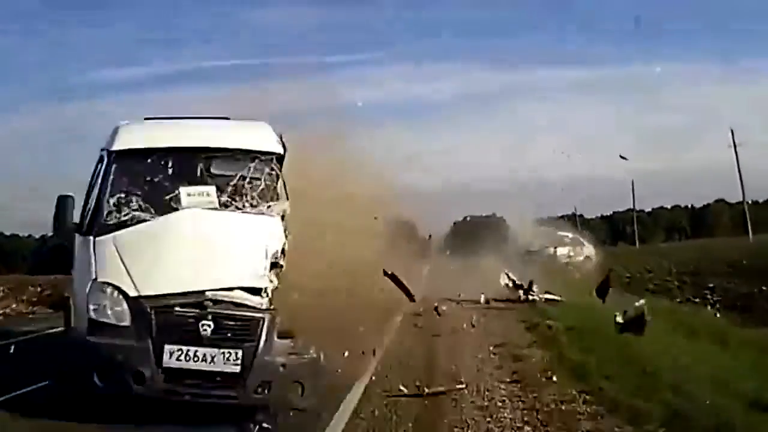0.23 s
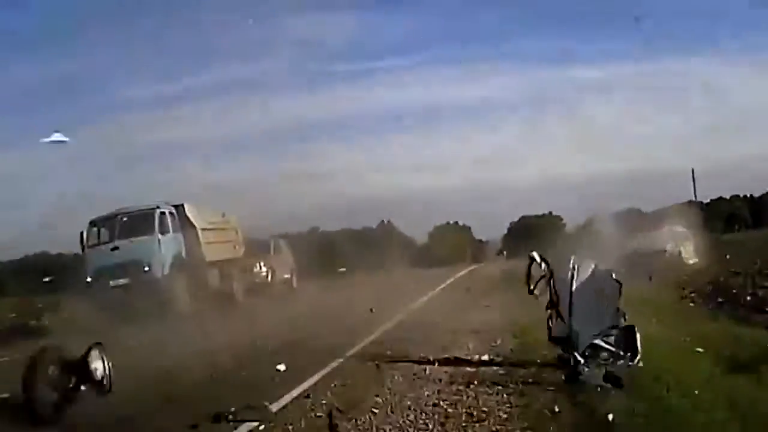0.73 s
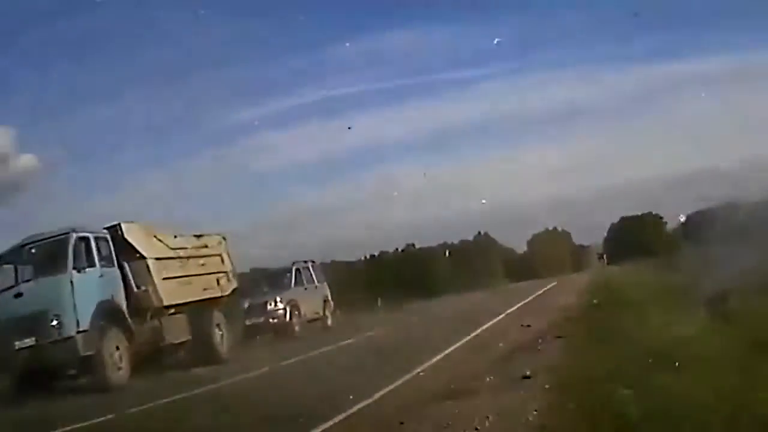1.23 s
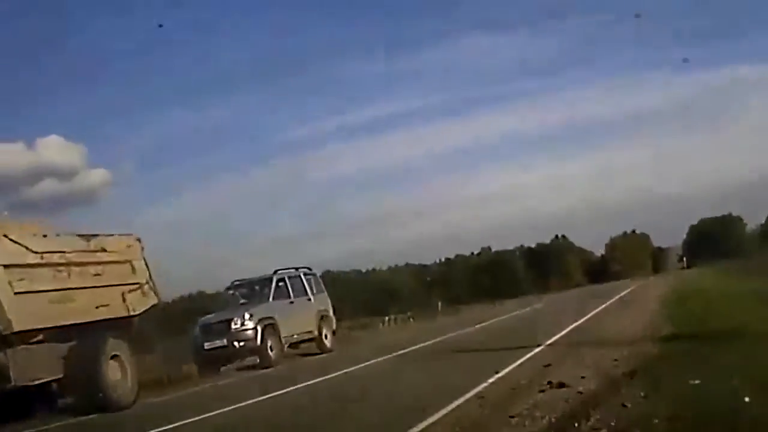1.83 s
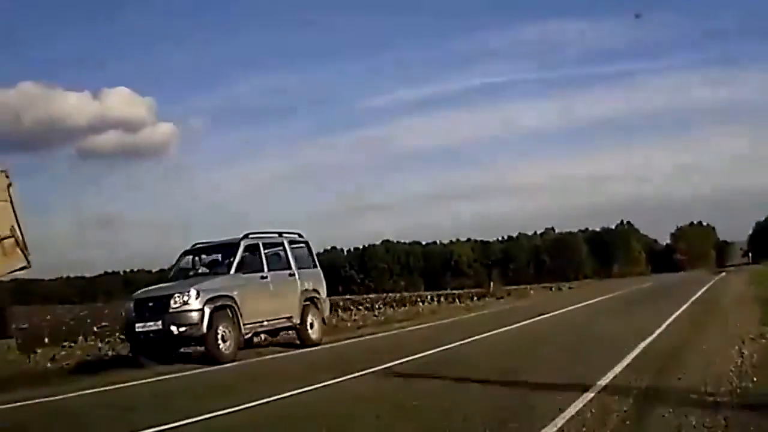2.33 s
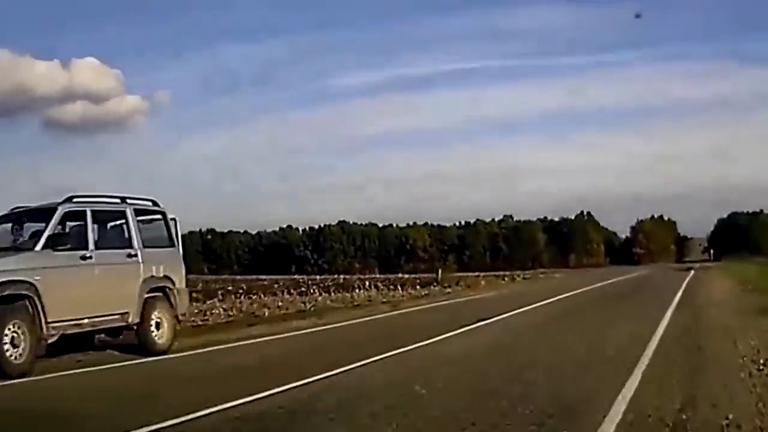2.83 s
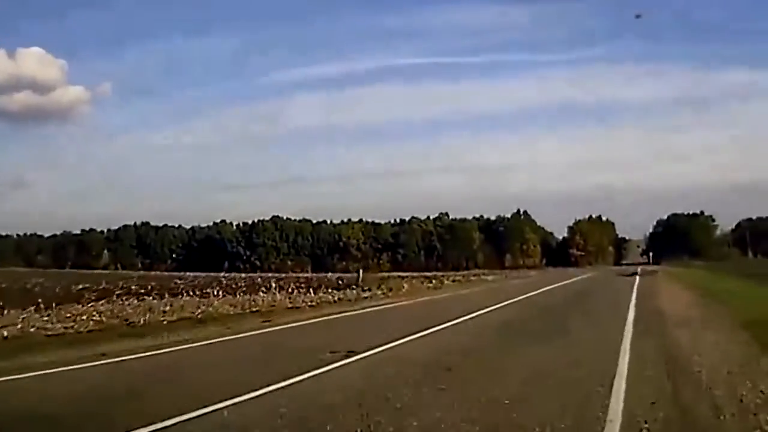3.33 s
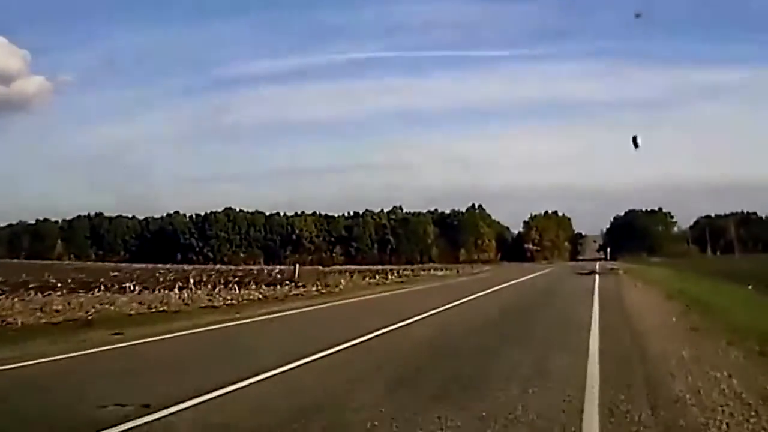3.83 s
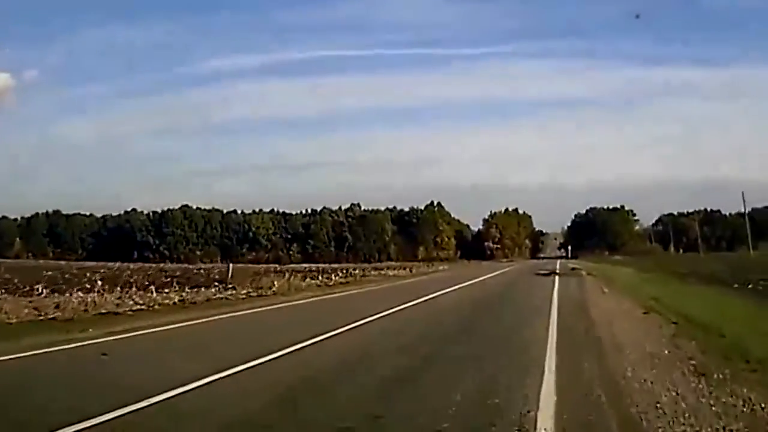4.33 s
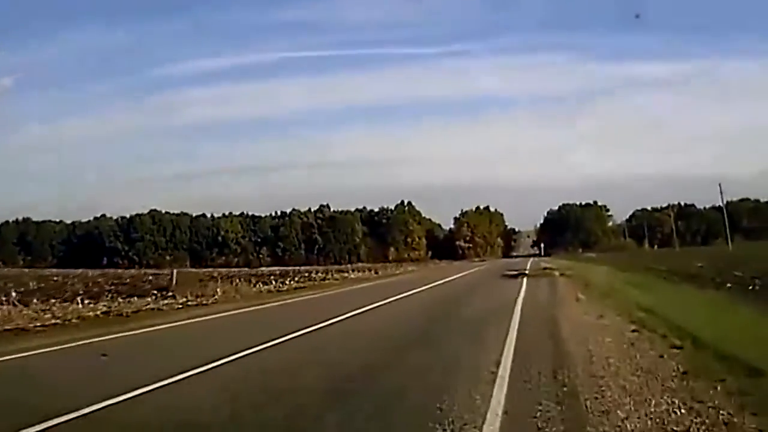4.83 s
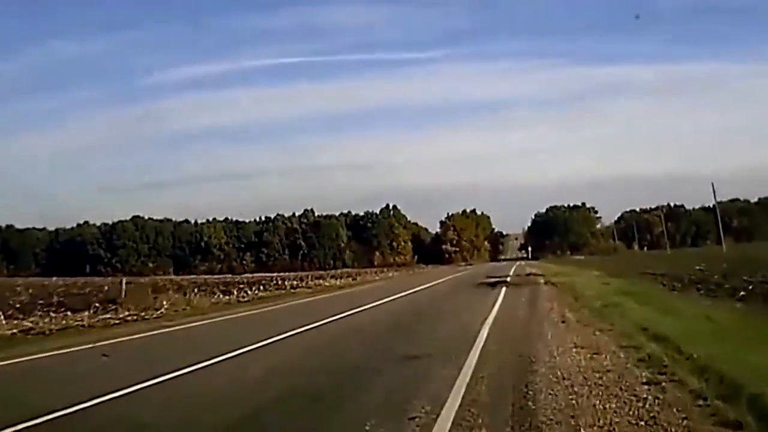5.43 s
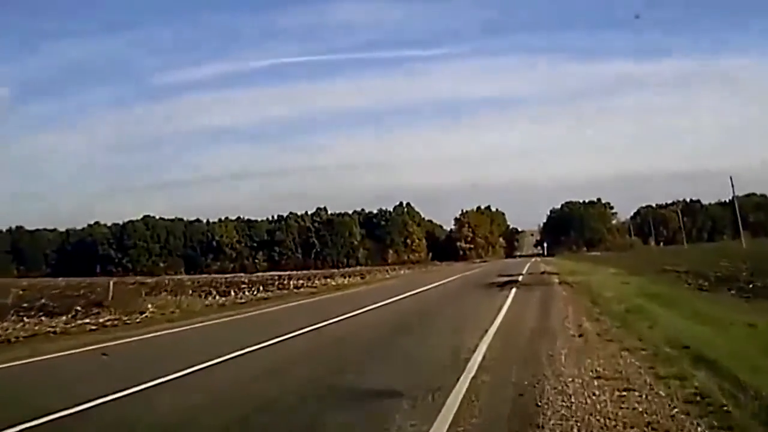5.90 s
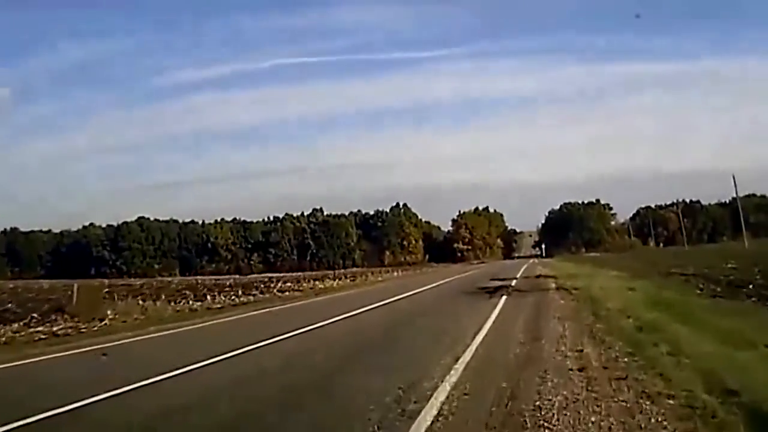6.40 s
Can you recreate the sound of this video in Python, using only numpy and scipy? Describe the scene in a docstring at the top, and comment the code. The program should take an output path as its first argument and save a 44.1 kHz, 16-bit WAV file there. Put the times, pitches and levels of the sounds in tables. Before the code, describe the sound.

A wrecked van skids past with a brief hoarse tyre squeal and metal scraping the road. For about two seconds fragments and grit crack against a car's windscreen while heavier wreckage thumps its body, distorting the sound. The car then brakes hard, tyres scrubbing and groaning, and rolls on with low road noise and a few jolts. A small dashboard microphone hears it all inside the closed cabin.

```python
"""A wrecked van skids past a car, heard from a dashboard camera just behind that car's windscreen.
First the van's tyres squeal and its torn bodywork scrapes the road. For some two seconds fragments and
grit crack on the glass and heavier wreckage thumps the body, overloading the small microphone.
From about three seconds the car brakes hard, tyres scrubbing and groaning below the closed cabin;
after five it rolls on slowly, with a few jolts from the road."""
import sys
import numpy as np
from scipy import signal
from scipy.fft import irfft, next_fast_len
from scipy.io import wavfile

SR = 44100
rng = np.random.default_rng(int(sys.argv[2]) if len(sys.argv) > 2 else 0)


def unload_audio(sound):
    """Save the sound as a 16-bit wav file, at the path given as the first command line argument."""
    columns = np.transpose(np.atleast_2d(sound))
    # keep every value between -1 and 1, then stretch to whole-number steps
    steps = np.round(np.clip(columns, -1, 1) * 32767)
    wavfile.write(sys.argv[1], SR, steps.astype(np.int16))


N = 293789
TIME = np.arange(N) / SR

# Fragments on the windscreen, right by the microphone. Each row: start in seconds, relative crack level
# in dB, ring pitch in Hz, ring in dB over the crack, knock level in dB, crack's 60 dB decay in seconds.
FRAGMENTS = [(0.316, -41, 1500, 6, -17.5, 0.041), (0.4274, -15, 3740, -6, -10.5, 0.074),
             (0.516, -22, 4496, -21, -38, 0.013), (0.5448, -12.5, 1760, -5, -13.5, 0.037),
             (0.561, -14.5, 2600, -12, -20, 0.04), (.5735, -22.5, 4300, -6, -30, 0.028),
             (.641, -23, 1540, 1, -20, 0.098), (0.674, -29.5, 2740, 3, -42, 0.068),
             (0.7055, -23, 1340, -3, -13, 0.048), (0.7198, -23, 5170, -9, -35, 0.018),
             (0.7300, -22.5, 4130, -2, -35.5, 0.054), (0.786, -22.5, 4540, -13, -32, 0.013),
             (0.802, -37, 4500, -5, -38, .01), (0.826, -34, 2840, -1, -38, 0.089),
             (0.8451, -25, 5430, -9, -29, 0.0078), (0.918, -11.5, 2430, 10.5, -13.5, 0.033),
             (0.9644, -23, 2700, -5, -20, 0.023), (.975, -31.5, 2770, 0, -19, 0.08),
             (1.059, -18.5, 3570, 0, -39, 0.035), (1.0639, -13, 2730, 4, -18, 0.015),
             (1.0958, -32, 5000, -3, -29, 0.04), (1.119, -29, 1240, 1, -24, 0.11),
             (1.154, -28, 4350, -13, -37, 0.023), (1.204, -27.5, 4130, 3, -39, 0.17),
             (1.236, -23, 3970, -1, -21, 0.082), (1.280, -32, 4800, -2, -34, 0.011),
             (1.308, -21.5, 3000, 3, -28, .02), (1.322, -23, 3000, 7, -20.5, 0.022),
             (1.356, -15, 2630, 10, -22.5, 0.017), (1.378, -16, 3110, 3, -27, 0.026),
             (1.4218, -25, 5000, -11, -27, 0.022), (1.4766, -31, 1490, -9, -26, 0.048),
             (1.5584, -22, 4970, -11, -20, 0.026), (1.594, -33, 1280, -9, -20.5, .035),
             (1.6572, -19.5, 2690, 7, -19, 0.027), (1.714, -32.5, 5000, -23, -20, 0.17),
             (1.735, -35, 5200, -16, -23, 0.028), (1.785, -38.5, 2900, 0, -43, 0.22),
             (1.8176, -15.5, 2000, -6, -10.5, 0.071), (1.902, -43, 4500, -8, -43, 0.038),
             (1.9286, -19, 2770, -7, -22.5, 0.015), (2.0127, -45, 2780, 0, -38, 0.057),
             (2.0537, -26, 2960, -4, -25, 0.022), (2.0942, -31.5, 1470, 0, -19, 0.07),
             (2.153, -32, 2680, 13, -31, 0.026), (2.184, -19.5, 1290, 10, -14.5, 0.13),
             (2.378, -48, 1390, 8, -26, .1), (2.4601, -31.5, 4000, -8, -22.5, 0.098)]
# Stones flung into the wheel arches, farther off, while braking. Each row reads as for the fragments.
STONES = [(2.787, -41, 2900, -4, -41, .03), (2.969, -33.5, 2760, 17, -36, 0.05),
          (3.448, -39, 4070, -7, -24, 0.033), (3.7334, -42, 3000, 2, -36, .02),
          (3.846, -51, 3000, 3, -33, .04), (4.3729, -46, 3980, -6, -26, 0.022),
          (4.4373, -35, 3100, 5, -28, .025), (4.56, -38, 3620, -2, -28, .035),
          (4.709, -39.5, 3820, 0, -31, 0.03), (4.77, -41, 3700, 2, -29, .035),
          (4.8254, -44, 3300, 2, -34, .02)]
# Spectra of a hit's bright crack and dull knock. Each row: frequency in Hz, level in dB.
CRACK_COLOUR = [(300, -15.5), (1000, -3.5), (1600, -1), (2100, 1.5), (2800, 5.5), (3600, -3.5),
                (5000, -3.5), (6300, -15.5), (7700, -9.5), (8600, -55)]
KNOCK_COLOUR = [(25, 2), (80, -13), (200, -13), (600, 0.5), (1000, 5), (1500, -6.5), (2200, -34.5),
                (3000, -18.5), (5000, -30), (8000, -50)]
def fragments(crack_gain_db=2, ring_width_hz=520, tail_db=-22, tail_t60=0.13, knock_t60=0.065,
              flex_s=0.00046, contact_s=0.00057):
    """Each piece cracks and rings briefly at its own pitch; the struck panel flexes with a knock."""
    out, t = np.zeros(N), np.arange(8192) / SR
    ring_shape = np.array([(-2, -40), (-.5, -6), (0, 0), (.5, -6), (2, -40)])  # widths off centre, dB
    for start, crack_db, ring_hz, ring_db, knock_db, t60 in FRAGMENTS + STONES:
        ring = noise(ring_shape * [ring_width_hz, 1] + [ring_hz, 0], len(t))
        crack = unit(noise(CRACK_COLOUR, len(t)) + amp(ring_db) * ring) * amp(-60 * t / t60)
        crack += noise(CRACK_COLOUR, len(t)) * amp(tail_db - 60 * t / tail_t60)  # faint cabin tail
        crack *= 1 - np.exp(-t / contact_s)
        knock = noise(KNOCK_COLOUR, len(t)) * amp(-60 * t / knock_t60) * (1 - np.exp(-t / flex_s))
        add(out, start, amp(crack_db + crack_gain_db) * crack + amp(knock_db) * knock)
    return out


# Heavy blows on the body around the microphone, and later jolts from the road.
# Each row: start in seconds, relative level in dB, 60 dB decay in seconds, panel note in Hz.
THUMPS = [(.049, -19.5, 0.063, 556), (.087, -16.5, 0.037, 740), (0.115, -17, 0.029, 684),
          (0.140, -18.5, 0.038, 680), (.315, -11.5, 0.062, 350), (.428, -12, 0.34, 609),
          (.545, -20.5, 0.29, 784), (.703, -15.5, 0.21, 615), (0.831, -17.5, 0.17, 443),
          (.919, -13.5, 0.053, 372), (.965, -30, .07, 740), (1.128, -14.5, 0.068, 745),
          (1.164, -19.5, 0.18, 578), (1.214, -12.5, 0.17, 197), (1.284, -15, 0.16, 790),
          (1.41, -12, 0.15, 555), (1.462, -19.5, 0.13, 627), (1.765, -24.5, 0.34, 522),
          (1.804, -19.5, 0.11, 900), (1.819, -6.5, 0.085, 577), (1.975, -25.5, 0.084, 920),
          (2.08, -27, 0.4, 757), (2.186, -22.5, 0.35, 820), (2.349, -26.5, 0.062, 740),
          (2.462, -19.5, 0.19, 791), (2.540, -22, 0.093, 610), (2.778, -29.5, 0.15, 560),
          (2.851, -25.5, 0.15, 910), (5.07, -35, 0.81, 191), (5.561, -28, 0.076, 680),
          (5.693, -19, 0.044, 817), (5.758, -29.5, 0.35, 560), (6.008, -31, 0.072, 760),
          (6.24, -31.5, 0.25, 748), (6.282, -31, 0.23, 577), (6.59, -35, 0.12, 560)]
def thumps(gain_db=-1.0, rise_s=0.0021, note_t60=0.15):
    """Large panels take a few milliseconds to move, then boom, one note standing out at first."""
    out, t = np.zeros(N), np.arange(16384) / SR
    for start, db, t60, hz in THUMPS:
        note = amp(-60 * t / note_t60) * unit(np.sin(2 * np.pi * hz * t))
        panel = boom(edge_hz=1.2 * hz, size=len(t)) + note
        envelope = amp(gain_db + db - 60 * t / t60) * (1 - np.exp(-t / rise_s))
        add(out, start, panel * envelope)
    return out


# Body panels heard from inside, before the treble roll-off. Each row: frequency in Hz, level in dB.
PANEL_COLOUR = [(30, -19.5), (100, -7), (200, -4.5), (400, 4), (600, 9.5), (8000, 10.5)]
def boom(edge_hz, size, steepness=3.32):
    """The dull noise of large body panels, falling away above an edge."""
    hz = np.geomspace(30, 9000, 40)
    colour = read(PANEL_COLOUR, hz) - 20 * np.log10(1 + (hz / edge_hz) ** steepness)
    return noise(np.column_stack([hz, colour]), size)


# The van's sliding tyres outside, dropping in pitch as it passes.
# Each row: time in seconds, level in dB, pitch in Hz.
SQUEAL = [(0, -51, 850), (.16, -33.5, 772), (.24, -36, 761), (.28, -26.5, 742), (.33, -25, 749),
          (.355, -29.5, 769), (.39, -25.5, 719.5), (.44, -31, 679), (.475, -27, 648), (.5, -46, 610)]
# Its torn bodywork scraping the road. Each row: time in seconds, level in dB.
SCRAPE = [(0, -35.5), (.12, -38.5), (.22, -31), (.4, -31), (.51, -26), (.57, -20), (.68, -30), (.85, -38)]
# Spectrum of that scrape. Each row: frequency in Hz, level in dB.
SCRAPE_COLOUR = [(200, -34), (700, 2), (930, 7.5), (1250, -1.5), (1500, -8), (2100, -13.5), (2800, -11),
                 (3400, -12), (3900, -21.5), (4500, -22.5), (5500, -38), (8000, -40.5)]
def van(waver=0.01245, width_hz=38, octave_db=-15, hoarse=0.5, chatter_db=2.0):
    """A hoarse stick-slip squeal with a smeared octave, over the chatter of dragging metal."""
    times, _, hz = np.transpose(SQUEAL)
    pitch = np.interp(TIME, times, hz) * (1 + waver * wander(30.03))
    squeal = stick_slip(pitch, width_hz) + amp(octave_db) * stick_slip(2 * pitch, 2 * width_hz)
    squeal *= 1 + hoarse * wander(280)
    scrape = noise(SCRAPE_COLOUR, N) * level(SCRAPE) * amp(chatter_db * wander(53.1))
    return squeal * level(SQUEAL) + scrape


# The car's own tyres, below the cabin, bite once lightly, then again and again under hard braking.
# Each row: start and end in seconds, then levels of scrub, loose gravel and shudder in dB.
BITES = [(2.046, 2.306, -30.5, -54, -42), (2.872, 3.258, -19, -41.5, -32.5),
         (3.306, 3.456, -18.5, -42.5, -36), (3.694, 4.009, -21.5, -48.5, -52),
         (4.092, 4.29, -21, -47.5, -38.5), (4.27, 4.717, -20, -46.5, -35.5),
         (4.734, 5.025, -21, -50, -35.5)]
# Spectra of the scrub, the gravel and the shuddering body. Each row: frequency in Hz, level in dB.
SCRUB_COLOUR = [(30, -32.5), (120, -22.5), (220, -17), (330, 0), (560, 0.5), (760, -3), (1000, -7),
                (1500, -18.5), (2100, -27.5), (2800, -30), (3600, -41), (8000, -62)]
GRAVEL_COLOUR = [(300, -5), (1300, 2), (2000, 1.5), (3000, -0.5), (3600, -7), (4300, -7), (5000, -19),
                 (6000, -16.5), (8000, -26.5)]
SHUDDER_COLOUR = [(20, -3.5), (60, -5.5), (130, -1.5), (230, 4), (330, 9), (600, -56.5)]
def braking(drag_db=-29, judder_db=1.5, boxiness=0.7):
    """Tyres grip and slip in quick turns, grinding loose stones; the body shudders as they bite."""
    shape = dict(attack_s=0.027, release_db_per_s=106.5, arch_db=2)
    drag = swell(BITES[1][0], BITES[-1][1], drag_db, **shape)  # lighter scrub all through hard braking
    swells = [[swell(start, end, db, **shape) for db in levels] for start, end, *levels in BITES]
    bite, grind, shake = np.max(swells, axis=0)
    scrub = noise(SCRUB_COLOUR, N) * np.maximum(bite, drag)
    shudder = noise(SHUDDER_COLOUR, N) * shake
    gravel = grains(GRAVEL_COLOUR, per_s=900, spread_db=4.5) * grind
    tyres = shudder + (scrub + gravel) * amp(judder_db * wander(30))
    # Coming up through the body, the tyres excite the cabin more strongly.
    return ring_through(tyres, lambda hz: boxiness * cabin(hz))


# Short groans of skidding tyres, heard from inside the car.
# Each row: start and length in seconds, level in dB, first and last pitch in Hz.
GROANS = [(.485, 0.03, -21, 756, 790), (.515, 0.037, -21, 687, 720), (0.587, 0.07, -25.5, 363, 362),
          (.6, 0.051, -29.5, 713, 783), (1.887, 0.0453, -31, 280, 560), (2.07, 0.068, -34.5, 480, 550),
          (2.873, 0.094, -24.5, 712.4, 676), (2.995, 0.08, -23.5, 699, 717),
          (3.02, 0.22, -26.5, 532.6, 546), (3.9, .09, -27.5, 537, 549), (4.14, 0.132, -29.5, 517, 523),
          (4.47, 0.24, -32.5, 511.3, 535), (4.52, 0.16, -28, 717, 723), (4.98, 0.12, -30.5, 677, 748)]
def groans(width_hz=22, fade_s=0.017):
    """For a moment the tread sticks and slips evenly, and the scrub turns into a note."""
    out, t = np.zeros(N), np.arange(12000) / SR
    for start, length, db, first_hz, last_hz in GROANS:
        fade = np.clip(np.minimum(t, length - t) / fade_s, 0, 1)
        pitch = np.interp(t, [0, length], [first_hz, last_hz])
        add(out, start, amp(db) * fade * stick_slip(pitch, width_hz))
    return out


def stick_slip(hz, width_hz):
    """The hoarse tone of sliding rubber, following a pitch curve; rms 1."""
    smooth = signal.butter(2, width_hz / 2, fs=SR, output="sos")
    slips = signal.sosfilt(smooth, rng.standard_normal(len(hz)) + 1j * rng.standard_normal(len(hz)))
    slips /= np.sqrt(abs(slips) + 1e-12)  # friction limits the swing, which keeps the tone even
    return unit((slips * np.exp(2j * np.pi * np.cumsum(hz) / SR)).real)


def overrun(batter_db=3.5, floor_db=-10.0):
    """The car runs over wreckage, which batters the underside and sets the floor booming."""
    push = swell(start=1.148, end=1.22, db=-13, attack_s=0.051, release_db_per_s=90, arch_db=3)
    underside = boom(edge_hz=610, size=N) + amp(floor_db) * noise(SHUDDER_COLOUR, N)
    return underside * push * amp(-batter_db * wander(60))


# Showers of grit on the glass and bonnet, just ahead of the microphone.
# Each row: start and end in seconds, mid-shower level in dB.
SHOWERS = [(0.535, 0.746, -39.5), (1.145, 1.327, -28.5), (1.51, 1.556, -43)]
# Spectrum of the grit. Each row: frequency in Hz, level in dB.
GRIT_COLOUR = [(150, 5.5), (700, 3.5), (1500, -0.5), (2100, -4), (2900, 0), (3600, -6.5), (4100, 0),
               (4500, -11), (5300, -11), (6200, -24), (7600, -19.5), (8500, -56)]
def grit(dust_db=-6, cloud_db=-61, chips_db=-60.5):
    """Grains of gravel in a hissing cloud of dust, thickening into showers, with a few sharper chips."""
    shape = dict(attack_s=0.039, release_db_per_s=231, arch_db=-5)
    cloud = swell(start=0.64, end=1.3, db=0, **shape)
    showers = sum(swell(*row, **shape) for row in SHOWERS)
    spray = grains(GRIT_COLOUR, per_s=600, spread_db=4.5)
    chips = grains(CRACK_COLOUR, per_s=75, spread_db=3)
    dusty_spray = unit(spray + amp(dust_db) * noise(GRIT_COLOUR, N))
    return (showers + amp(cloud_db) * cloud) * dusty_spray + amp(chips_db) * cloud * chips


# Tyre roar filling the cabin, loud through the wreckage and quiet once the car has slowed.
# Each row: time in seconds, level in dB.
ROAD = [(0, -34), (.4, -30), (.55, -30.5), (.8, -28), (.9, -32), (1.05, -29.5), (1.3, -29.5), (1.5, -28),
        (1.78, -33), (1.88, -36.5), (1.98, -34), (2.2, -28.5), (2.34, -33.5), (2.4, -31.5), (2.84, -36.5),
        (5.15, -39), (5.3, -36), (6.66, -37)]
# Spectra of the roar and the rumble under it. Each row: frequency in Hz, level in dB.
ROAR_COLOUR = [(30, -24.5), (100, -17.5), (160, -14), (230, -7.5), (380, -3.5), (540, -1), (750, -2),
               (950, -8.5), (1250, -12), (2100, -24), (2850, -21.5), (3600, -34.5), (5000, -42),
               (8000, -56)]
RUMBLE_COLOUR = [(20, -3), (60, 0.5), (160, 2.5), (400, -40.5)]
def road(lumpy_db=0.8, rumble_db=16):
    """Tyre roar flutters with the uneven asphalt, over a rumble that fades faster as the car slows."""
    gain = level(ROAD)
    rumble = noise(RUMBLE_COLOUR, N) * gain ** 2 * amp(rumble_db)
    roar = noise(ROAR_COLOUR, N) * gain
    return (roar + rumble) * amp(lumpy_db * wander(35))


# Resonances of the cabin and camera housing, at the dashboard.
# Each row: centre and width in Hz, relative gain in dB, negative where waves cancel.
CABIN = [(76.5, 17, 0.5), (135, 26, 2), (162, 54, -1), (195, 28, 1), (222, 26, 1.5), (249.5, 9.9, 7),
         (276.7, 24.5, -6.5), (336, 30, 0), (342, 31.6, 3), (387, 51, -6), (447.4, 32, 3.5),
         (487, 57.4, -5.5), (510.2, 23.3, 4.5), (545.5, 45, 2.5), (596, 22, -3.5), (623, 34, 2),
         (715, 16, -1.5), (693, 20, 1), (743.4, 15, 4), (904, 30, -2), (1017, 42, 2), (1056, 55, -5.5),
         (1115, 12, 2.5), (1126, 32, 0.5), (1177, 22, 3.5), (1357, 23, 1), (1360, 40, -1), (1400, 17, 2),
         (1470, 22, -0.5), (1605, 40, 2.5), (1840, 56, -3.5), (2160, 62, -4), (2450, 40, -2.5),
         (2550, 45, 4), (2814, 100, 4), (2893, 69, 1.5), (3077, 58, 4), (3570, 89, -5)]
def cabin(hz, echo_share=0.2, echo_s=0.01005, absorb_hz=1400, depth=1.104):
    """Gain in dB of the closed cabin: resonances, and one rear reflection dulled by the seats."""
    echo = echo_share / (1 + (hz / absorb_hz) ** 4)
    comb = 20 * np.log10(abs(1 + echo * np.exp(-2j * np.pi * hz * echo_s)))
    resonances = sum(db / (1 + (2 * (hz - centre) / width) ** 2) for centre, width, db in CABIN)
    return comb + depth * resonances


def amp(db):
    """Decibels to gain."""
    return 10 ** (np.asarray(db) / 20)


def unit(x):
    """Scales to rms 1."""
    return x / np.sqrt(np.mean(x ** 2) + 1e-20)


def level(rows):
    """Gain over time from (s, dB) rows, dying away after the last."""
    times, db = np.transpose(rows)[:2]
    return amp(np.interp(TIME, times, db) - 690 * np.maximum(TIME - times[-1], 0))


def swell(start, end, db, attack_s, release_db_per_s, arch_db):
    """Gain over time: an attack, a hold that arches (or sags, if arch_db is negative), a release."""
    place = np.clip((TIME - start) / (end - start), 0, 1)
    attack = np.clip((TIME - start) / attack_s, 0, 1)
    fade_db = release_db_per_s * np.maximum(TIME - end, 0)
    return attack * amp(db - arch_db * (2 * place - 1) ** 2 - fade_db)


def read(colour, hz):
    """A spectrum in dB, its points joined on a log-frequency axis."""
    points_hz, db = np.transpose(colour)
    return np.interp(np.log(hz + 1), np.log(points_hz + 1), db)


def add(mix, start_s, sound):
    """Mixes a sound in at the given time."""
    part = mix[max(round(start_s * SR), 0):][:len(sound)]
    part += sound[:len(part)]


def noise(colour, size):
    """Noise of rms 1 with the given spectrum and random phases."""
    length = next_fast_len(size)
    hz = np.fft.rfftfreq(length, 1 / SR)
    spectrum = amp(read(colour, hz)) * np.exp(2j * np.pi * rng.random(len(hz)))
    return unit(irfft(spectrum, length)[:size])


def wander(rate_hz):
    """Random motion of rms 1, turning at the given rate."""
    knots = rng.standard_normal(2048)
    return unit(np.interp(TIME * rate_hz, np.arange(len(knots)), knots))


def grains(colour, per_s, spread_db):
    """Random tiny impacts, mostly small and a few large; rms 1."""
    clicks = (rng.random(N) < per_s / SR) * rng.choice([-1, 1], N)
    sizes = amp(spread_db * np.minimum(rng.exponential(1, N), 4))
    return unit(ring_through(clicks * sizes, lambda hz: read(colour, hz)))


def ring_through(x, db_of, size=8192):
    """Causal (minimum-phase) filter with the gain db_of(Hz)."""
    log_gain = np.log(amp(db_of(abs(np.fft.fftfreq(size, 1 / SR)))))
    response = np.fft.ifft(np.exp(np.conj(signal.hilbert(log_gain)))).real
    return signal.oaconvolve(x, response[:size // 2])[:N]


def scene():
    """Everything reaches the dashboard through the cabin, in mono."""
    sources = road() + braking() + groans() + van() + grit() + fragments() + thumps() + overrun()
    return ring_through(sources, cabin)[None]


def gain_control(x, threshold_db=-15, share=0.3, recovery_db_per_s=50):
    """Loud blows pull the camera's gain down quickly, and it creeps back."""
    power = signal.lfilter(*signal.butter(1, 40, fs=SR), x ** 2)
    power_db = 10 * np.log10(abs(power) + 1e-12)
    fall_db = TIME * recovery_db_per_s
    held_db = np.maximum.accumulate(power_db + fall_db) - fall_db
    over_db = np.maximum(held_db - threshold_db, 0)
    return x * amp(-share * signal.lfilter(*signal.butter(1, 10, fs=SR), over_db))


# The small microphone's own hiss. Each row: frequency in Hz, level in dB.
HISS_COLOUR = [(100, 3.5), (4000, 2), (8000, 1), (9000, -40)]
def record(dry, hiss_db=-64.5, top=0.4, bottom=0.12, knee=3, coupling_hz=15, edge_hz=8250):
    """The camera's microphone: hiss, gain control, overload and a band limit."""
    x = gain_control(dry[0] + amp(hiss_db) * noise(HISS_COLOUR, N))
    ceiling = np.where(x > 0, top, bottom)  # negative swings flatten first
    x = x / (1 + abs(x / ceiling) ** knee) ** (1 / knee)
    x = signal.lfilter(*signal.butter(2, coupling_hz, "highpass", fs=SR), x)
    lowpass = signal.firwin(201, edge_hz, window=("kaiser", 8), fs=SR)
    return signal.oaconvolve(x, lowpass, "same")[None]


dry = scene()
out = record(dry)
unload_audio(out)
```